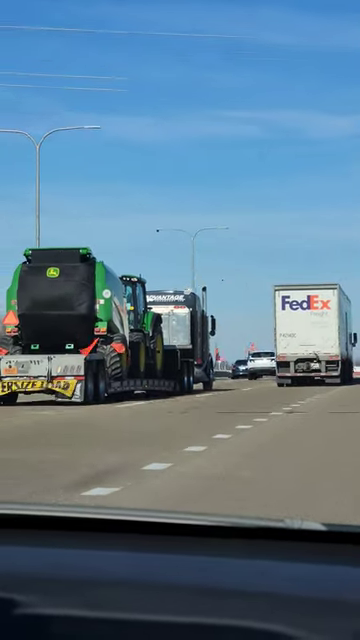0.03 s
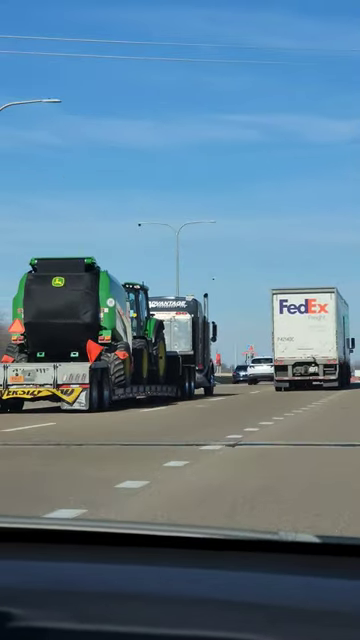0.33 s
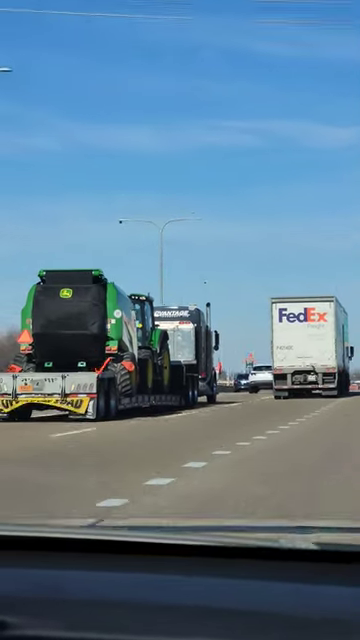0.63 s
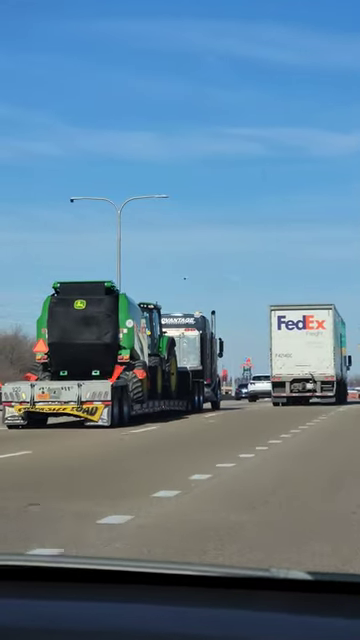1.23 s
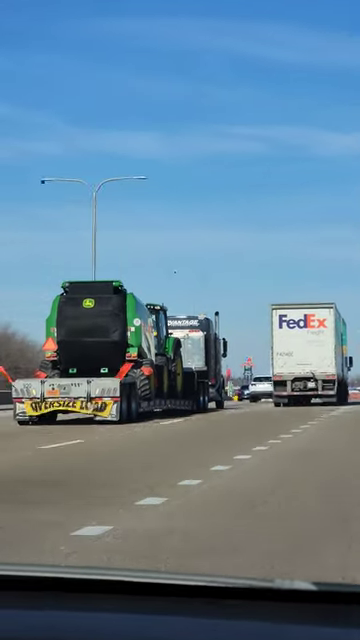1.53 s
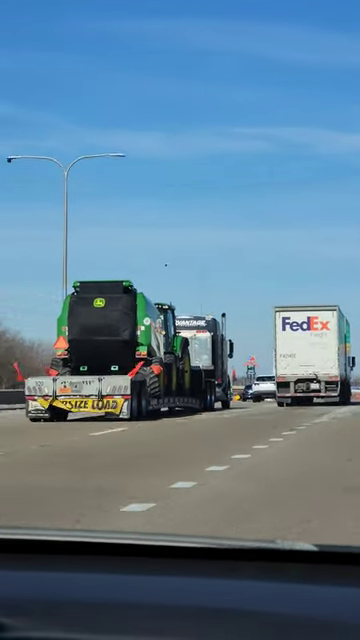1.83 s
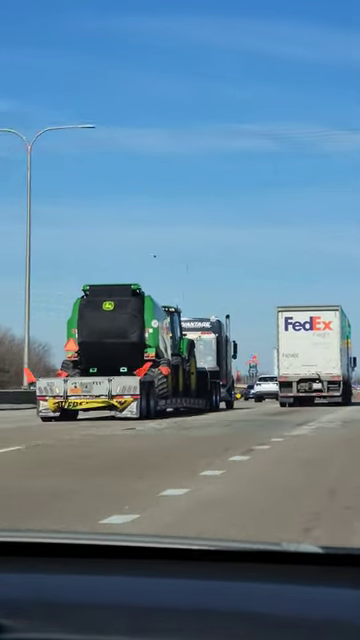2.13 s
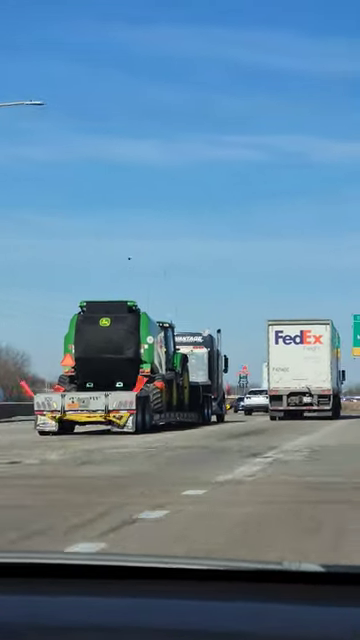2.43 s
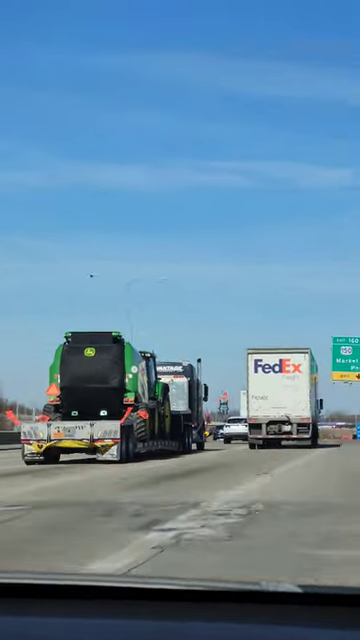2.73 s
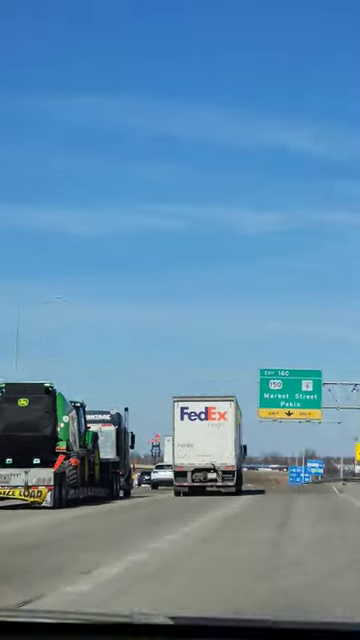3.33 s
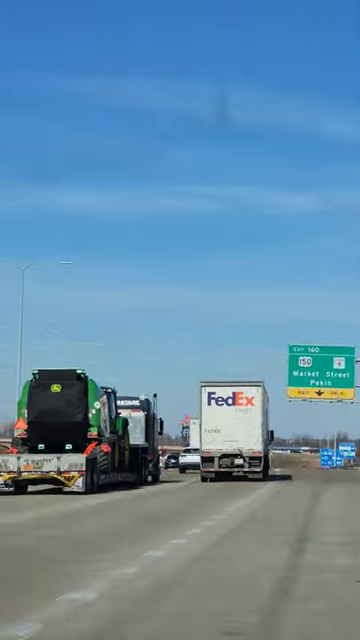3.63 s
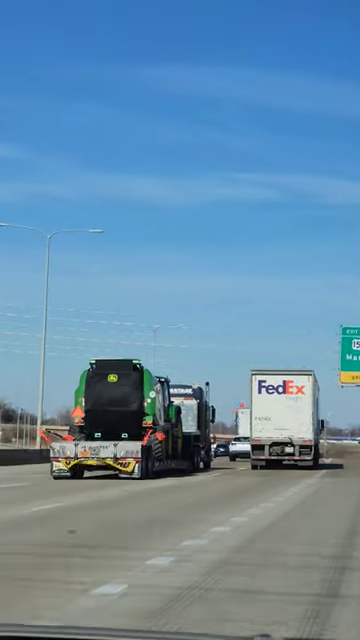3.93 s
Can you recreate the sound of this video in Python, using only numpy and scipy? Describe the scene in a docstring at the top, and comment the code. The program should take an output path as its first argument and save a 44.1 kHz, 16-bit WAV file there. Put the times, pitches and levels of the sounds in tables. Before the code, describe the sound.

A deep road rumble booms throughout inside a car at highway speed, heard from the dashboard with tyre roar, light wind hiss and a few faint ticks. At about 1.1 seconds the tyres thud over a joint. From 3.2 to 3.6 seconds they bump across a rough patch, and something small taps close on the right at 3.3. The tyres whine faintly near the end.

```python
"""A deep rumble comes first: inside a car at highway speed, heard in stereo from the dashboard.
The road shakes the body and booms in the cabin, with tyre roar, tread whine and wind hiss above it.
Faint ticks sound in the cabin; the tyres slap over a joint and later cross a rough patch, where
something small taps close by on the right and rebounds. At the end the tread sings faintly on
smoother concrete. A limiter holds the biggest bumps."""
import sys
import numpy as np
from scipy import signal
from scipy.fft import rfft, irfft, next_fast_len
from scipy.io import wavfile
from scipy.ndimage import uniform_filter1d, minimum_filter1d, map_coordinates

SR = 44100
rng = np.random.default_rng(int(sys.argv[2]) if len(sys.argv) > 2 else 0)


def dump_mix(stems):
    """Bounce the given channels to the path in sys.argv[1] as a 16-bit WAV at rate SR."""
    frames = np.atleast_2d(stems).T  # one column per channel
    limited = np.clip(frames, -1, 1)  # hard clip at full scale
    pcm = np.round(limited * 32767).astype(np.int16)
    wavfile.write(sys.argv[1], SR, pcm)


N = 176400


def amp(db):
    """Decibels to gain."""
    return 10 ** (np.asarray(db) / 20)


def unit(x):
    """Scale to rms 1."""
    return x / np.sqrt(np.mean(x ** 2) + 1e-20)


def clock():
    """Seconds at each sample."""
    return np.arange(N) / SR


def along(points, hz):
    """(Hz, value) points read on a log axis."""
    knots_hz, values = np.transpose(points)
    return np.interp(np.log(hz + 1), np.log(knots_hz + 1), values)


def curve(rows):
    """(s, value) points read at each sample."""
    return np.interp(clock(), *np.transpose(rows))


def wobble(rate):
    """A smooth random curve, rate knots a second."""
    return map_coordinates(rng.standard_normal(int(N * rate / SR) + 4), [clock() * rate])


def filtered(x, response):
    """Shape x by a gain that depends on frequency."""
    size = next_fast_len(N + SR // 4)
    return irfft(rfft(x, size) * response(np.fft.rfftfreq(size, 1 / SR)), size)[..., :N]


def steadied(x, span_s):
    """Noise with its chance swells longer than span_s evened out."""
    power = np.abs(uniform_filter1d(np.mean(x ** 2, axis=0), int(span_s * SR) + 1))
    return unit(x / np.sqrt(uniform_filter1d(power, int(span_s * SR / 2) + 1) + 1e-9))


def decay(t, t60_s):
    """Envelope that falls 60 dB in t60_s."""
    return np.exp(-np.log(1000) * t / t60_s)


def blow(peak_s, rise_s, t60_s):
    """Envelope that swells up to peak_s and dies away."""
    t = clock() - peak_s
    return np.exp(np.minimum(t, 0) / rise_s) * decay(np.maximum(t, 0), t60_s)


# How alike the microphone's two sides are. Each row: frequency in Hz, coherence from 0 to 1.
COHERENCE = [(30, 0.93), (160, 0.99), (250, 0.92), (500, 0.48), (1000, 0.44), (2500, 0.35), (8000, 0.14)]

def cabin_noise(response):
    """Stereo noise of rms 1: the bass is shared by both sides, the treble diffuse."""
    def mid_side_gains(hz):
        spread = np.arccos(np.clip(along(COHERENCE, hz), -1, 1)) / 2
        return response(hz) * [np.cos(spread), np.sin(spread)]
    mid, side = filtered(rng.standard_normal((2, N)), mid_side_gains)
    return unit(np.array([mid + side, mid - side]))


def rush(colour):
    """Broad cabin noise with the given spectrum."""
    return cabin_noise(lambda hz: amp(along(colour, hz)))


def ring(centre_hz, width_hz):
    """Cabin noise in one narrow resonance."""
    return cabin_noise(lambda hz: 1 / (1 + ((hz - centre_hz) / width_hz) ** 2))


# All round the microphone: body shake, mostly under 90 Hz, and cabin boom near 120 Hz.
# Each row: time in seconds, relative level in dB.
SHAKE_LEVEL = [(0, -13.5), (.14, -11), (.26, -17), (.39, -19), (.47, -8), (.58, -22.5), (.67, -12.5),
               (.8, -17.5), (.95, -13.5), (1.15, -19.5), (1.27, -7), (1.33, -17), (1.45, -19), (1.95, -19),
               (2.12, -15.5), (2.26, -18.5), (3.05, -17), (3.16, -8.5), (3.3, -10), (3.42, -16.5),
               (3.6, -21), (3.72, -21), (3.85, -30), (4, -11.5)]
BOOM_LEVEL = [(0, -10.5), (.28, -13.5), (.38, -15.5), (.53, -9.5), (.62, -16), (.78, -12), (1.03, -13),
              (1.14, -5), (1.29, -15), (1.38, -17), (1.7, -18), (1.95, -12.5), (2.2, -16), (3.06, -17),
              (3.19, -10), (3.3, -13.5), (3.53, -9.5), (3.61, -12), (3.7, -23.5), (4, -16.5)]
# Their spectra. Each row: frequency in Hz, relative level in dB.
SHAKE_SPECTRUM = [(12, -34), (21, -21.5), (27, -6.5), (42, -2.5), (56, -4.5), (72, 1), (88, -6.5),
                  (115, -5.5), (200, -47.5), (500, -88), (2000, -140)]
BOOM_SPECTRUM = [(40, -43), (76, -12), (92, -0.5), (118, 1), (133, -3.5), (147, 1), (160, -9), (200, -14.5),
                 (245, -18), (330, -38), (700, -85.5), (3000, -140)]

def body_rumble():
    """The road's unevenness shakes the body and booms in the cabin."""
    shake = amp(curve(SHAKE_LEVEL) + 1) * steadied(rush(SHAKE_SPECTRUM), span_s=0.061)
    boom = amp(curve(BOOM_LEVEL) - 0.5) * steadied(rush(BOOM_SPECTRUM), span_s=0.081)
    return shake + boom


# Roar and tread noise from the road below. Each row: time in seconds, relative level in dB.
ROAR_LEVEL = [(0, -27.5), (.37, -27.5), (.5, -30), (.85, -29), (1.08, -25.5), (1.36, -35), (1.55, -28.5),
              (1.68, -32.5), (2.3, -31), (3.1, -30.5), (3.48, -32.5), (3.7, -39), (3.85, -39.5), (4, -33)]
TREAD_LEVEL = [(0, -40.5), (1.1, -38.5), (1.35, -41.5), (2.3, -40.5), (3.1, -38), (3.45, -40.5),
               (3.68, -42), (4, -39)]
# Their spectra inside the car. Each row: frequency in Hz, relative level in dB.
ROAR_SPECTRUM = [(120, -24.5), (260, 2), (330, -1), (440, -5), (520, -8.5), (700, -12), (1000, -18),
                 (2000, -42), (5000, -72.5), (9000, -120)]
TREAD_SPECTRUM = [(400, -27), (700, -18.5), (900, 0.5), (1150, -1), (1300, -1.5), (1600, -5.5),
                  (1900, -8.5), (2600, -17.5), (6000, -58.5), (9000, -110)]
# Resonances of tyres and cabin. Each row: centre in Hz, width in Hz, average level in dB.
HUM_RESONANCES = [(414.7, 13, -45), (458, 6.9, -45.5), (823, 18, -51.5), (951, 42, -47.5),
                  (2130, 16, -62.5), (2940, 52, -64), (3750, 45, -70)]

def tyre_roar():
    """Rolling tyres roar and hum with the road surface, under a higher rush from the tread."""
    surface_db = curve(ROAR_LEVEL)
    roar = amp(surface_db + 1 + 0.91 * wobble(18)) * rush(ROAR_SPECTRUM)
    tread = amp(curve(TREAD_LEVEL) + 1.1 * wobble(3.4)) * rush(TREAD_SPECTRUM)
    hums = sum(amp(db) * ring(hz, width) for hz, width, db in HUM_RESONANCES)
    hum_swell = amp(0.95 * (surface_db - surface_db.mean()))
    return roar + tread + hum_swell * hums


# A low and a high whine from the tyres. Each row: time in seconds, relative level in dB.
LOW_WHINE_LEVEL = [(0, -44), (.6, -46), (.85, -40.5), (1.05, -45), (1.4, -50), (3.2, -48.5), (3.6, -47),
                   (3.85, -46), (4, -45)]
HIGH_WHINE_LEVEL = [(0, -55.5), (1.8, -56.5), (2.6, -46), (3.05, -47.5), (3.4, -41.5), (3.7, -45),
                    (4, -42.5)]
# Their resonances. Each row: centre in Hz, width in Hz, relative level in dB.
LOW_WHINE_TONES = [(1123, 23, 2)]
HIGH_WHINE_TONES = [(1310, 220, -7), (1494, 14, -4), (1626, 65, -3), (1920, 150, -12)]

def tread_whine(level, tones):
    """The tread whines in narrow resonances that swell and fade together."""
    resonances = sum(amp(db) * steadied(ring(hz, width), span_s=0.17) for hz, width, db in tones)
    return amp(curve(level)) * resonances


# Hiss from beyond the windows. Each row: time in seconds, level in dB.
HISS_LEVEL = [(0, -49), (.3, -49), (.47, -54), (.62, -50), (.9, -52), (1.15, -49), (1.35, -53), (2, -52.5),
              (2.3, -51), (2.75, -49.5), (3, -53.5), (3.22, -47.5), (3.48, -50), (3.6, -53), (3.8, -57.5),
              (4, -57)]
# Its spectrum inside the car. Each row: frequency in Hz, relative level in dB.
HISS_SPECTRUM = [(900, -20.5), (1900, -11), (2400, 2), (2750, -1), (2980, 1.5), (3400, -4), (3720, -5),
                 (4600, -11.5), (6200, -15), (7000, -19.5), (7600, -20.5), (8500, -26), (10000, -39.5),
                 (12000, -27), (15500, -33)]

def wind_hiss():
    """Air and tyre hiss comes through the glass, flickering slightly."""
    return amp(curve(HISS_LEVEL) + 0.89 * wobble(18)) * rush(HISS_SPECTRUM)


# Faint ticks around the cabin; those from 3.33 to 3.371 s are the close tap's tail and rebound.
# Each row: peak in seconds, dull part in dB, fizz in dB.
CABIN_TICKS = [(.603, -55, -73), (1.175, -49.5, -52), (1.658, -49, -50), (1.663, -57, -58),
               (2.38, -51, -76), (3.168, -49.5, -63.5), (3.330, -44, -63), (3.365, -48, -50.5),
               (3.371, -45.5, -51), (3.501, -49, -64)]
# Spectra of the two parts. Each row: frequency in Hz, relative level in dB.
DULL_SPECTRUM = [(1500, -24), (3300, 0), (4400, 5.5), (6000, -1.5), (7300, -2), (9000, -15.5),
                 (15000, -27.5)]
FIZZ_SPECTRUM = [(4000, -49.5), (9500, -10), (10500, -5.5), (12300, 1), (15000, -0.5)]

def cabin_ticks():
    """Faint ticks in the cabin, plus the close tap's short tail and rebound."""
    dull, fizz = rush(DULL_SPECTRUM), rush(FIZZ_SPECTRUM)
    return sum((amp(dull_db) * dull + amp(fizz_db) * fizz) * blow(peak_s, rise_s=0.0015, t60_s=0.022)
               for peak_s, dull_db, fizz_db in CABIN_TICKS)


# Modes of wheel and body. Each row: frequency in Hz, relative level in dB, seconds to fall 60 dB.
WHEEL_MODES = [(830, -0.5, 0.084), (863, -8, 0.14), (955, 0, 0.066), (1137, -10.5, 0.16), (1360, -13, 0.13)]

def wheel_knock(start_s, rise_s=0.0022):
    """One blow to the wheel sets it and the body ringing hollowly."""
    t = np.maximum(clock() - start_s, 0)
    ringing = 0
    for hz, db, t60_s in WHEEL_MODES:
        phase_turns = rng.random() + 0.06 * rng.standard_normal((2, 1))  # a little apart on each side
        ringing += amp(db) * decay(t, t60_s) * np.sin(2 * np.pi * (hz * t + phase_turns))
    return ringing * (1 - np.exp(-t / rise_s))


# Joints and patches passing under the car. Each row: peak in seconds, rise in seconds,
# thud pitch in Hz, then the levels of thud, clunk, slap and knock in dB.
ROAD_JOINTS = [(1.091, .004, 118, -10.5, -40, -37.5, -21.5), (1.113, 0.0048, 142, -2.5, -23, -28, -16.5),
               (1.242, 0.0092, 62, -11.5, -44, -38, -44), (3.175, 0.0069, 104, -4.5, -28.5, -33, -35),
               (3.413, 0.0091, 112, -11.5, -41, -38.5, -35),
               (3.460, 0.026, 114, -10.5, -32.5, -29.5, -35.5), (3.508, 0.015, 116, -9, -27, -37.5, -46.5),
               (3.618, .006, 114, -7, -44, -48, -51)]
# Spectra of clunk and slap. Each row: frequency in Hz, relative level in dB.
CLUNK_SPECTRUM = [(150, -21), (300, -2), (440, 1.5), (580, -2.5), (750, -24.5), (2000, -61), (6000, -120)]
SLAP_SPECTRUM = [(200, -2.5), (400, -18.5), (680, -3), (830, 4), (970, 1.5), (1200, 0.5), (1400, -3),
                 (2000, -11), (4000, -38.5), (9000, -78.5)]

def road_joints():
    """Tyres hit each joint with a thud, a clunk, a slap and a knock; worn patches swell more slowly."""
    clunk = steadied(rush(CLUNK_SPECTRUM), span_s=0.012)
    slap = steadied(rush(SLAP_SPECTRUM), span_s=0.017)
    bumps = 0
    for peak_s, rise_s, thud_hz, thud_db, clunk_db, slap_db, knock_db in ROAD_JOINTS:
        thud = steadied(ring(thud_hz, width_hz=15), span_s=0.071)
        bumps += blow(peak_s, rise_s, t60_s=0.17) * amp(thud_db) * thud
        bumps += blow(peak_s, rise_s, t60_s=0.14) * (amp(clunk_db) * clunk + amp(slap_db) * slap)
        bumps += amp(knock_db) * wheel_knock(peak_s)
    return bumps


# Modes of something small, close to the microphone on the right.
# Each row: frequency in Hz, relative level in dB, seconds to fall 60 dB.
CLICK_MODES = [(3080, 6.5, 0.0021), (6060, 1.5, 0.0022), (6850, -14, 0.0034), (10300, -8, 0.0021),
               (12100, -14.5, 0.0045), (14800, -19, 0.0021)]

def close_tap(start_s=3.328, rise_s=0.00025, left_lag_s=0.00016, left_db=-15):
    """One thin, hard, dead click that reaches the right side first and louder."""
    t = np.maximum(clock() - start_s - np.array([[left_lag_s], [0]]), 0)
    modes = sum(amp(db) * decay(t, t60_s) * np.sin(2 * np.pi * hz * t) for hz, db, t60_s in CLICK_MODES)
    click = modes * (1 - np.exp(-t / rise_s))
    low_cut = signal.butter(5, 2600, "high", fs=SR, output="sos")
    return amp(-1.5) * signal.sosfilt(low_cut, click) * np.array([[amp(left_db)], [1]])


# Brief tones from the road below.
# Each row: peak in seconds, half length in seconds, pitch in Hz, level in dB.
SUNG_TONES = [(3.641, 0.024, 1492, -42), (3.648, .02, 1114, -41), (3.745, 0.024, 1606, -41),
              (3.748, 0.03, 1100, -35.5), (3.827, .019, 1503, -40)]

def tread_singing():
    """On smooth concrete the tread's whine sharpens into short wavering tones."""
    t = clock()
    waver_rad = 0.6 * wobble(30) + 0.53 * np.array([wobble(23), wobble(20)])  # shared, then per side
    tones = 0
    for peak_s, half_s, hz, db in SUNG_TONES:
        swell = np.exp(-((t - peak_s) / half_s) ** 2 / 2)
        tones += amp(db) * swell * np.sqrt(2) * np.sin(2 * np.pi * hz * t + waver_rad)
    return tones


# Balance at the microphone. Each row: frequency in Hz, left over right in dB.
LEFT_OVER_RIGHT = [(150, -0.45), (600, -0.3), (1100, -2), (2200, 1), (8000, -2)]

def scene():
    """All sources as they reach a stereo microphone at the dashboard."""
    whines = tread_whine(LOW_WHINE_LEVEL, LOW_WHINE_TONES)
    whines += tread_whine(HIGH_WHINE_LEVEL, HIGH_WHINE_TONES)
    tones = whines + tread_singing()
    drive = body_rumble() + tyre_roar() + tones + wind_hiss() + road_joints() + cabin_ticks()
    side_share = np.array([[0.5], [-0.5]])
    return filtered(drive, lambda hz: amp(along(LEFT_OVER_RIGHT, hz) * side_share)) + close_tap()


def record(dry):
    """A fast, smooth limiter holds peaks to full scale, then the recorder cuts the highest treble."""
    look_ahead_s, top_hz = 0.0023, 15350
    span = int(look_ahead_s * SR) + 1
    needed_gain = np.minimum(1, 1 / (np.abs(dry).max(axis=0) + 1e-9))
    held_gain = minimum_filter1d(needed_gain, 2 * span)
    smooth_gain = uniform_filter1d(uniform_filter1d(held_gain, span), span)
    return filtered(dry * smooth_gain, lambda hz: 1 / np.sqrt(1 + (hz / top_hz) ** 120))


dry = scene()
out = record(dry)
dump_mix(out)
```